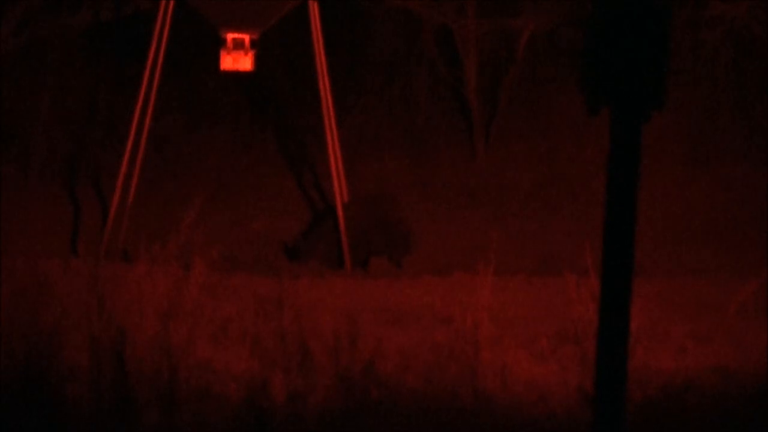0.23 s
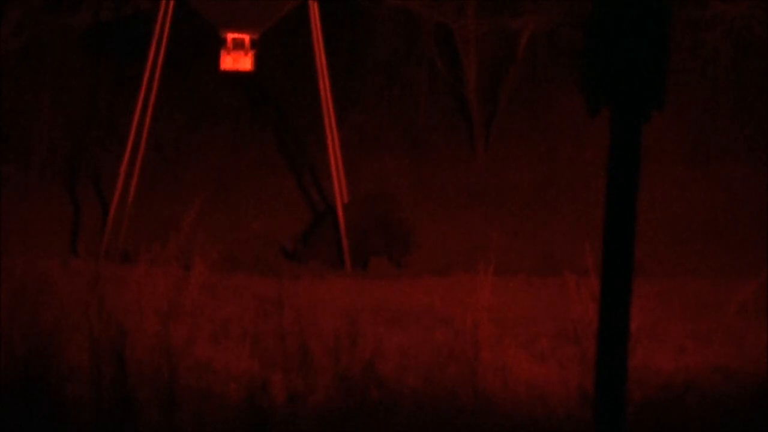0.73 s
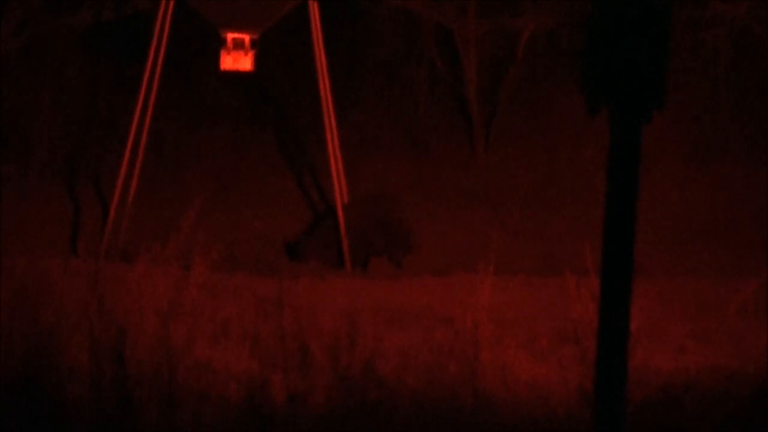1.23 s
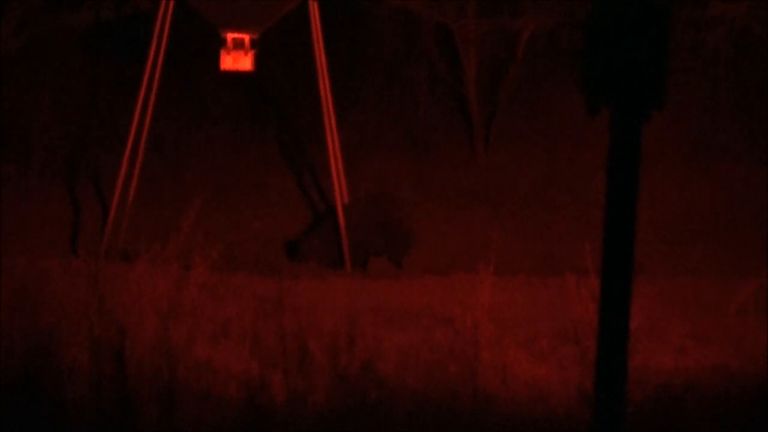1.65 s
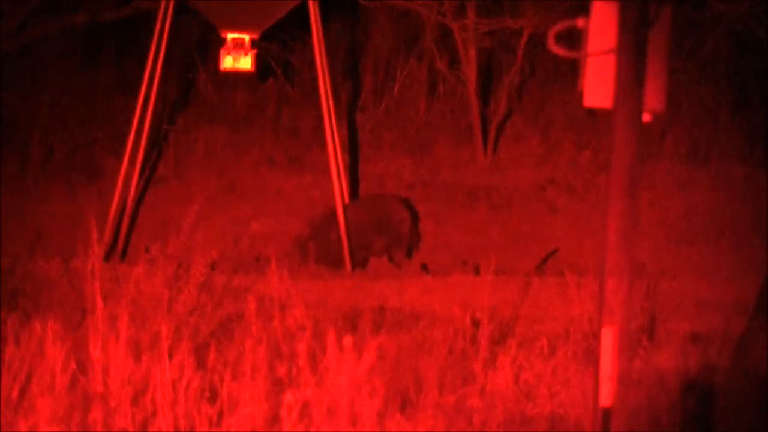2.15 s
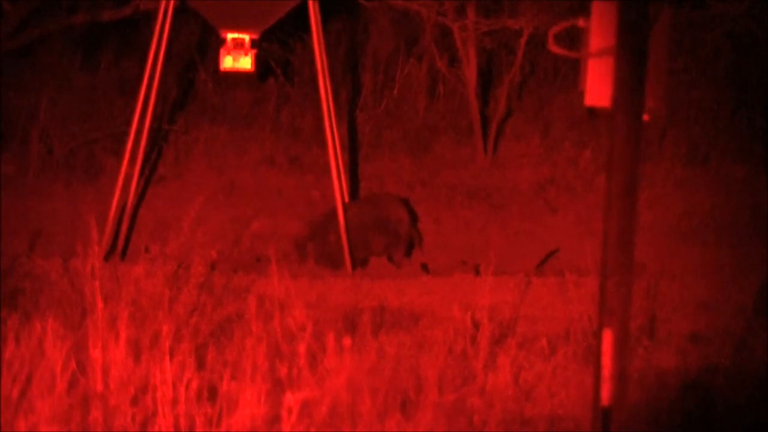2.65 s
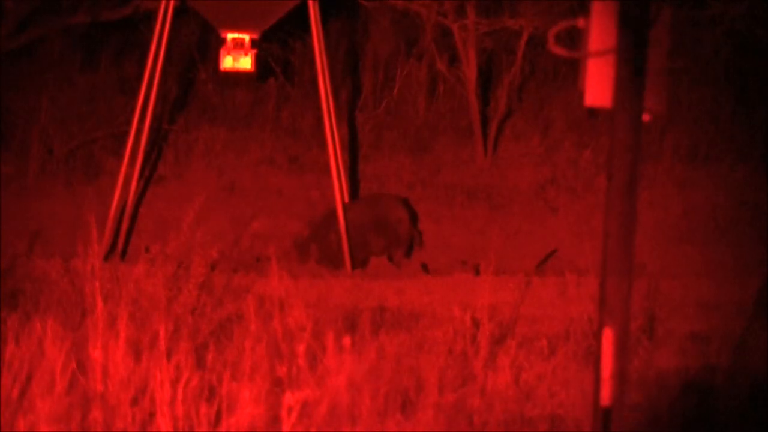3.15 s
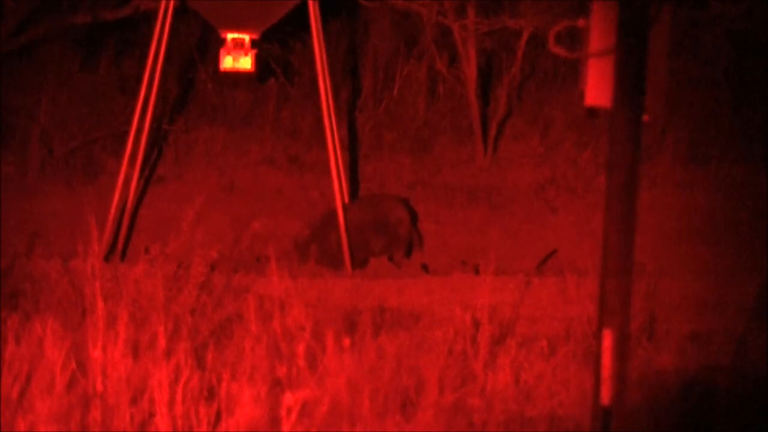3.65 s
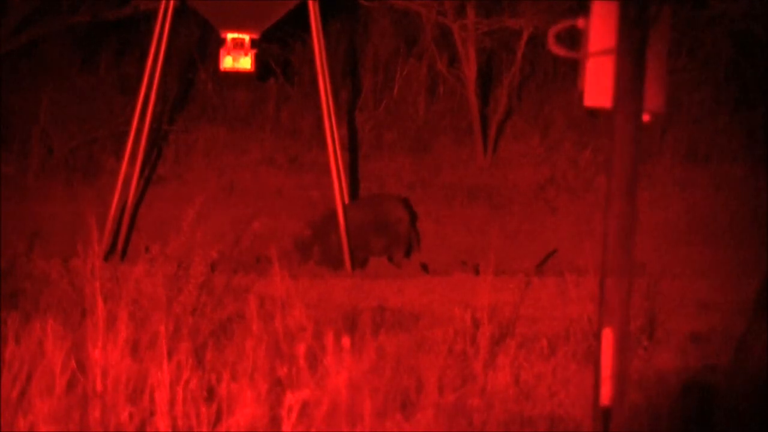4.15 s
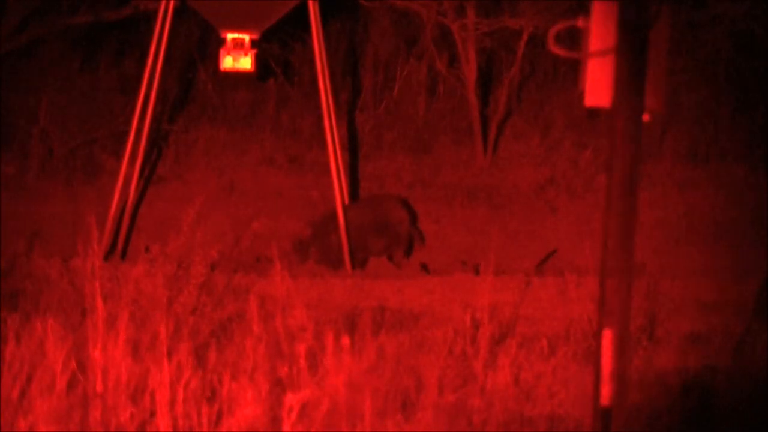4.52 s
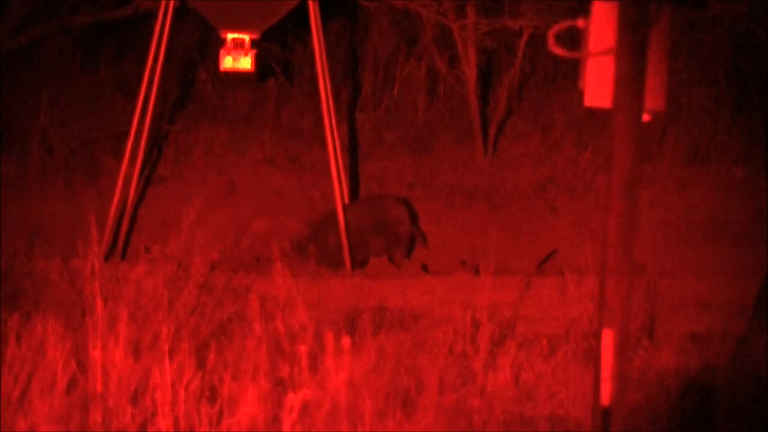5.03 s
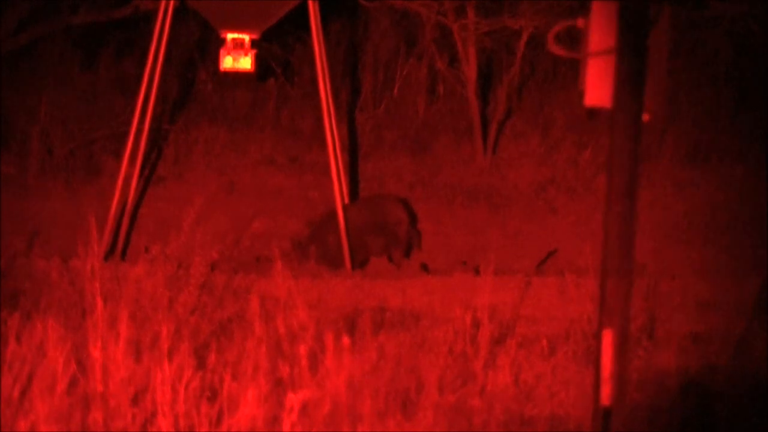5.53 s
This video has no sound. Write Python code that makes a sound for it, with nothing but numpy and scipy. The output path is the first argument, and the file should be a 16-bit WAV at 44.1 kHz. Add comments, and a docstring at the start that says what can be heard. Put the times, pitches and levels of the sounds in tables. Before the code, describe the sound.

A dense, shrill chorus of crickets trills steadily in the night brush for the whole six seconds or so, spread all around. Above it, katydids buzz with a very high rasp, a nearer one pulsing a little louder around 0.8, 1.6 and 5.2 seconds. Underneath, light wind makes a lumpy low rumble on the microphone, strongest in the first two seconds, calmer in the middle and rising again near 5. Soft, dull wind thumps land around 0.2, 1.1, 2.8, 4.7 and 5.3 seconds. A lamp switch close by gives two small, sharp ticks at about 2.0 and 2.3 seconds. The camera's motor throbs faintly throughout, its thin whine swelling slightly near 1 and 4.2 seconds. A faint, distant low drone rises at about 0.7 seconds and fades by 2. Dry grass gives barely audible rustles at 0.2 and 3.4 seconds.

```python
"""A dense chorus of crickets trills in the brush at night, with katydids buzzing above it in pitch.
Both stridulate: a scraper on one wing crosses a file on the other, which gives the crickets a ringing
tone and the katydids a broad rasp. Turbulent air thumps and rumbles on the microphone of a standing
camera, whose motor hums and whines faintly. A lamp switch ticks twice; dry grass rustles, and a
faint drone lies far off in the night air."""
import sys
import numpy as np
from scipy import signal
from scipy.fft import rfft, irfft
from scipy.io import wavfile

SR = 44100
rng = np.random.default_rng(int(sys.argv[2]) if len(sys.argv) > 2 else 0)


def unload_wav(signal):
    """Save mono or channel-first audio to the path in sys.argv[1] as 16-bit WAV at rate SR, clipped to [-1, 1]."""
    wavfile.write(
        sys.argv[1],
        SR,
        np.round(np.clip(np.atleast_2d(signal).T, -1, 1) * 32767).astype(np.int16),
    )


N = 255339
T = np.arange(N) / SR
HZ = np.fft.rfftfreq(N, 1 / SR)

# spectrum of a turbulent puff: (frequency [Hz], relative density [dB])
PUFF_SPECTRUM = [(20, -35), (50, -14), (130, 7.5), (220, 2), (330, -8), (480, -15.5), (750, -31),
                 (1500, -50)]
# spectrum of still air, also of the motor's rub: (frequency [Hz], relative density [dB])
AIR_SPECTRUM = [(15, -37), (40, -11), (90, 3), (170, -2), (300, -12.5), (430, -20), (600, -21), (800, -29),
                (1300, -28.5), (2200, -37.5), (4300, -87), (9000, -46)]


def cricket(hz, stroke_hz, fall_hz, duty=.6, unsteady=.04, drift_hz=25, swell_db=2.5):
    """Stridulation: each closing of the wings drives their resonance on a falling pitch."""
    strokes = rng.random() + np.cumsum(stroke_hz * (1 + unsteady * wander(6))) / SR
    closing = np.minimum(strokes % 1 / duty, 1)
    pitch = hz + fall_hz * (.5 - closing) + drift_hz * wander(20)
    stroke_phase = rng.random(1024)[strokes.astype(int) % 1024]
    pressure = np.sin(np.pi * closing ** 0.93)  # the scraper bites quickly and eases off
    ring = np.sin(2 * np.pi * (np.cumsum(pitch) / SR + stroke_phase))
    return pressure * ring * amp(swell_db * wander(9))


def crickets(count=4, rate_spread=.04, echo_db=-6):
    """Superposition: a choir sums insects near one pitch, each with its own tempo and echoes."""
    # choirs: (carrier [Hz], carrier spread [Hz], stroke rate [Hz], fall per stroke [Hz], level [dB])
    choirs = [(2758, 80, 60, 80, -60.5), (3323, 105, 66, 130, -46), (5684, 260, 58, 400, -39.5),
              (5963, 200, 72, 350, -38), (7690, 220, 59, 400, -53.5)]
    out = np.zeros(N)
    for hz, spread_hz, stroke_hz, fall_hz, db in choirs:
        choir = np.zeros(N)
        for offset in np.linspace(-1.3, 1.3, count):
            own_rate = stroke_hz * (1 + rate_spread * offset * rng.normal())
            voice = np.exp(-offset ** 2 / 2) * cricket(hz + offset * spread_hz, own_rate, fall_hz)
            choir += voice + amp(echo_db) * scatter(voice, t60=0.55)
        out += amp(db) * unit(choir)
    return out


def far_chorus(level_db=-33.5, swell_db=0.67):
    """Incoherent summation: hundreds of distant crickets blur into bands of shrill noise."""
    # spectrum of the chorus: (frequency [Hz], relative density [dB])
    shrill = [(2450, -44), (2750, -27), (3000, -25.5), (3300, -7), (3550, -19.5), (3780, -20.5),
              (4250, -52.5), (4650, -23), (5300, -9.5), (5900, 0.5), (6350, -5), (6680, -21), (7700, -19.5),
              (8600, -36)]
    return amp(level_db + swell_db * wander(6.4)) * noise(shrill)


def katydids(stroke_hz=15.6, sharpness=1.6, flutter_db=0.6, unsteady=0.03):
    """Amplitude modulation: wing strokes pulse a near katydid's rasp over the buzz of the others."""
    # spectrum of the wings: (frequency [Hz], relative density [dB])
    rasp = [(6500, -53.5), (8000, -9), (9000, -7), (10200, 0), (11600, 3), (13200, -3), (14400, -5),
            (15800, -12)]
    # the near insect's louder bouts: (time [s], level [dB], half-width [s])
    bouts = [(.8, -40.5, 0.29), (1.6, -41, 0.16), (5.2, -44, .5)]
    # the others together: (time [s], level [dB])
    buzz = [(0, -36.5), (1.2, -37), (2, -37), (3, -37.5), (4, -36), (4.8, -36), (5.4, -37.5), (5.79, -36.5)]
    strokes = np.cumsum(stroke_hz * (1 + unsteady * wander(1.9))) / SR
    pulses = unit(abs(np.cos(np.pi * strokes)) ** sharpness)
    near = pulses * swells(bouts, rest_db=-44.5) * noise(rasp)
    return near + amp(curve(buzz) + flutter_db * wander(35)) * noise(rasp)


def thumps(thump_db=-3.5, rise_s=0.0065, sag_per_s=5, puff_db=-3, puff_rise_s=.011):
    """Damped oscillation: a strong eddy shoves the diaphragm, then breaks up in a puff."""
    # eddies: (time [s], level re thump_db [dB], starting frequency [Hz], level re puff_db [dB])
    impacts = [(0.072, -21, 111, -30), (0.184, -15.5, 67.6, -35), (0.213, -11, 96, -37),
               (1.047, -12.5, 133, -36), (1.145, -25, 91, -39), (2.719, -11.5, 117, -25.5),
               (2.829, -16.5, 103, -28.5), (3.97, -27, 108, -33.5), (4.661, -19.5, 60, -32),
               (4.756, -17.5, 95, -60), (5.179, -20, 56, -30.5), (5.294, -17.5, 141, -31),
               (5.365, -16.5, 122, -27.5)]
    out, t = np.zeros(N), T[:SR // 8]
    shove, billow = pulse(t, rise_s) ** 2, pulse(t, puff_rise_s)
    turbulence = noise(PUFF_SPECTRUM)
    for s, db, hz, burst_db in impacts:
        cycles = amp(db + thump_db) * shove * np.sin(2 * np.pi * hz * t / (1 + sag_per_s * t))
        puff = amp(burst_db + puff_db) * billow * turbulence[round(s * SR):][:len(t)]
        add(out, s, cycles + puff)
    return out


def wind():
    """Strength of the wind as a gain: gusts and a light breeze add in power."""
    # gusts: (time [s], level [dB], half-width [s])
    gusts = [(.16, -30, 0.27), (.52, -30.5, 0.043), (.84, -39.5, 0.26), (1.15, -35.5, 0.046),
             (1.68, -33.5, 0.036), (2.281, -34.5, 0.03), (2.504, -38, 0.05), (2.772, -34.5, 0.12),
             (3.604, -36, 0.096), (4.028, -36.5, 0.043), (4.693, -33.5, 0.057), (5.264, -35, 0.2)]
    # breeze between them: (time [s], level [dB])
    breeze = [(0, -40), (1.4, -38.5), (2.6, -50.5), (3.2, -53), (4.3, -53.5), (5, -46), (5.79, -48)]
    return swells(gusts, curve(breeze))


def rumble(gain_db=0.66, lumps_db=3.5, lumps_per_s=22):
    """Turbulent pressure at a microphone port makes lumpy bass noise."""
    # spectrum of the wind: (frequency [Hz], relative density [dB])
    spectrum = [(10, -40), (28, -4.5), (52, 0.5), (120, -3.5), (200, -16.5), (320, -23), (450, -34.5),
                (700, -44), (1200, -50.5), (3000, -60)]
    return wind() * amp(gain_db + lumps_db * wander(lumps_per_s)) * noise(spectrum)


def eddies(eddy_db=-7, reference_db=-30, growth=1.49, flutter_db=3):
    """Power law: the flutter of small eddies grows faster than the wind itself."""
    flutter = amp(reference_db + eddy_db + flutter_db * wander(45))
    return flutter * (wind() / amp(reference_db)) ** growth * noise(PUFF_SPECTRUM)


def motor(turn_hz=23.89, unsteady=0.00317, waver_db=1.0, loose_rad=0.66, rub_db=-50):
    """Shaft harmonics nearly in phase throb once a turn, with a soft rub and a thin gear whine."""
    # harmonics: (multiple of the turn rate, rms level [dB])
    orders = [(3, -50.5), (4, -45.5), (5, -48), (6, -45.5), (7, -47.5), (9, -58.5), (12, -63.5), (13, -61),
              (24, -69.5), (26, -76)]
    # gear tones: (frequency [Hz], rms level before the swells [dB])
    gears = [(614, -77), (768.5, -72.5)]
    # swells of the whine: (time [s], gain [dB], half-width [s])
    whine_swells = [(1.06, 11, 0.36), (4.17, 7, 0.27), (5.2, -3, 0.85)]
    clock = np.cumsum(1 + unsteady * wander(4)) / SR

    def tone(hz, db):
        peak = np.sqrt(2) * amp(db + waver_db * wander(6.5))
        return peak * np.cos(2 * np.pi * hz * clock + loose_rad * wander(5))

    hum = sum(tone(order * turn_hz, db) for order, db in orders)
    whine = sum(tone(hz, db) for hz, db in gears) * swells(whine_swells, rest_db=-4)
    rub = unit(np.cos(np.pi * turn_hz * clock) ** 6) * noise(AIR_SPECTRUM)
    return hum + whine + amp(rub_db) * rub


def switch(rise_s=0.00024, spring_hz=4700, spring_rise_s=0.00049, echo_db=-14, lowest_hz=1500):
    """Impact excitation: plastic ticks for about one cycle and its spring rings, with a faint echo."""
    # ticks: (time [s], level before the high-pass [dB], frequency [Hz], spring re tick [dB])
    ticks = [(2.0403, -22, 2400, -9), (2.3164, -23.5, 1630, -5)]
    out, t = np.zeros(N), T[:SR // 100]

    def ring(hz, peak_s):
        return pulse(t, peak_s) ** 2 * np.sin(2 * np.pi * hz * (t - peak_s))

    for s, db, hz, spring_db in ticks:
        add(out, s, amp(db) * (ring(hz, rise_s) + amp(spring_db) * ring(spring_hz, spring_rise_s)))
    high_pass = signal.butter(2, lowest_hz, "high", fs=SR, output="sos")
    out = signal.sosfilt(high_pass, out)  # so small a part radiates no bass
    return out + amp(echo_db) * scatter(out, t60=0.25)


def grass(crackle_db=4):
    """Friction between dry stems gives brief, uneven bursts of noise."""
    # rustles: (time [s], level [dB], half-width [s])
    rustles = [(0.24, -55.5, 0.04), (3.35, -60, 0.027)]
    # spectrum of the stems: (frequency [Hz], relative density [dB])
    spectrum = [(400, -18), (900, 2), (2000, 7), (3000, -4), (6000, -33)]
    envelope = sum(amp(db) * np.exp(-((T - s) / width) ** 2) for s, db, width in rustles)
    return envelope * unit(noise(spectrum) * amp(crackle_db * wander(170)))


def night_air(air_db=-44.5):
    """Ambient noise: a steady low hush, and a far-off drone that swells and fades."""
    # course of the drone: (time [s], level [dB])
    drone_levels = [(0, -58), (.7, -46.5), (1.4, -45.5), (2.1, -54.5), (2.8, -56.5), (5.79, -58)]
    # its spectrum: (frequency [Hz], relative density [dB])
    drone_spectrum = [(150, -20), (310, 6.5), (420, -12), (620, -11), (800, -36), (1500, -41)]
    return amp(air_db) * noise(AIR_SPECTRUM) + amp(curve(drone_levels)) * noise(drone_spectrum)


def surroundings():
    """Superposition of all that arrives from every side, drawn anew at each call."""
    air = night_air()
    return crickets() + far_chorus() + katydids() + grass() + air + rumble() + eddies()


def scatter(x, t60):
    """Multiple scattering by stems and leaves: dense echoes that fall 60 dB in t60 seconds."""
    t = T[:SR // 5]
    echoes = rng.standard_normal(len(t)) * amp(-60 * t / t60)
    return signal.oaconvolve(x, echoes / np.linalg.norm(echoes))[:N]


def stereo(shared, stray, ease_s=0.029, narrowing=.7):
    """Partial coherence: the two microphone ports agree in the bass and differ most near 8 kHz."""
    # ports: (frequency [Hz], coherence [0-1], left phase lead [rad], left minus right [dB])
    ports = [(80, .985, 0, 1), (300, .96, 0, 0), (550, .97, 0, -.3), (1200, .999, 0, 0), (4800, .995, 0, 0),
             (6000, .91, 0, .4), (7000, .5, 0, -.3), (7900, .05, 0, -2), (8200, .45, -3.3, 0),
             (9500, .68, -1.8, 2.7), (11100, .8, -.7, 3.2), (11600, .985, 0, 1.8), (15000, .985, 0, .6)]
    # spans in which the image narrows: (start [s], end [s])
    spans = [(.77, 0.98), (1.36, 1.85), (3.86, 4.12), (4.71, 4.89), (5.56, 5.75)]
    coherence, lead, balance_db = over_hz(ports)
    spectrum, balance = rfft(shared), amp(balance_db / 2)
    coherent = coherence * spectrum * np.exp(-1j * lead)
    incoherent = np.sqrt(1 - coherence ** 2) * rfft(stray)
    wide = irfft((coherent + incoherent) / balance, N)
    centred = irfft(spectrum / balance, N)
    gate = sum(np.clip(np.minimum(T - start, end - T) / ease_s + .5, 0, 1) for start, end in spans)
    right = wide + narrowing * gate * (centred - wide)
    return np.array([irfft(spectrum * balance, N), right])


def amp(db):
    """Decibels to amplitude gain."""
    return 10 ** (np.asarray(db) / 20)


def unit(x):
    """Normalisation to rms 1."""
    return x / np.sqrt(np.mean(x ** 2) + 1e-20)


def curve(rows):
    """Linear interpolation of (time [s], value) rows."""
    return np.interp(T, *np.transpose(rows))


def over_hz(rows):
    """Interpolation of each column of (frequency [Hz], ...) rows on a log-frequency axis."""
    hz, *columns = np.transpose(rows)
    return [np.interp(np.log(HZ + 1), np.log(hz + 1), column) for column in columns]


def noise(spectrum):
    """Spectral shaping of white noise, scaled to rms 1."""
    return unit(irfft(rfft(rng.standard_normal(N)) * amp(over_hz(spectrum)[0]), N))


def wander(per_s):
    """Random drift of rms about 1, with per_s new values a second."""
    return np.interp(T * per_s, np.arange(1024), rng.standard_normal(1024))


def pulse(t, peak_s):
    """Critically damped envelope that reaches 1 at peak_s."""
    return t / peak_s * np.exp(1 - t / peak_s)


def swells(rows, rest_db):
    """Gain from a power sum of a resting level and (time [s], level [dB], half-width [s]) bells."""
    bells = sum(amp(db) ** 2 / (1 + ((T - s) / width) ** 2 / 2) ** 4 for s, db, width in rows)
    return np.sqrt(bells + amp(rest_db) ** 2)


def add(mix, s, sound):
    """Superposes a sound on the mix at time s."""
    part = mix[max(round(s * SR), 0):][:len(sound)]
    part += sound[:len(part)]


def scene():
    """Superposition at two ports: insects all round; thumps, motor and switch at the camera."""
    return stereo(surroundings() + thumps() + motor() + switch(), surroundings())


def record(dry, cutoff_hz=15750):
    """Band limiting: a linear-phase low-pass removes the highest treble."""
    low_pass = signal.firwin(801, cutoff_hz, window=("kaiser", 9), fs=SR)
    return signal.oaconvolve(dry, low_pass[None], "same")


dry = scene()
out = record(dry)
unload_wav(out)
```